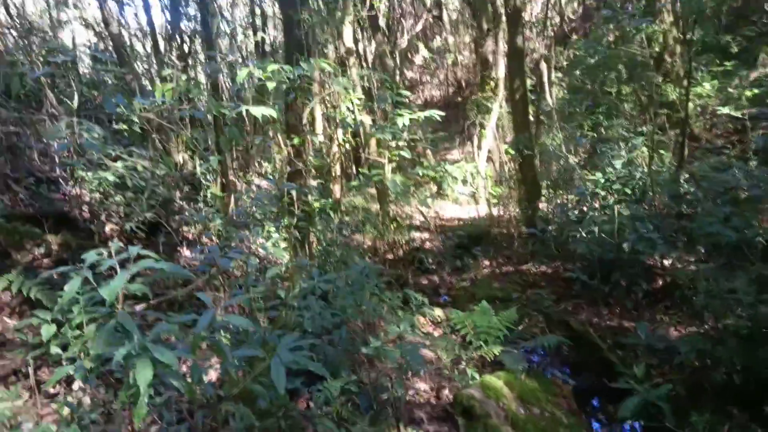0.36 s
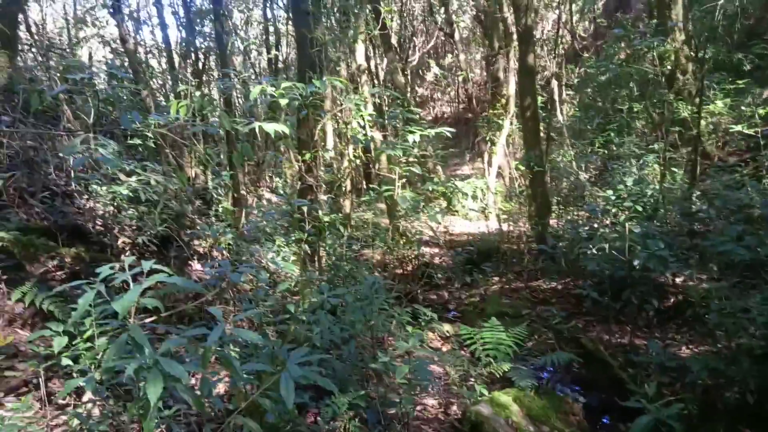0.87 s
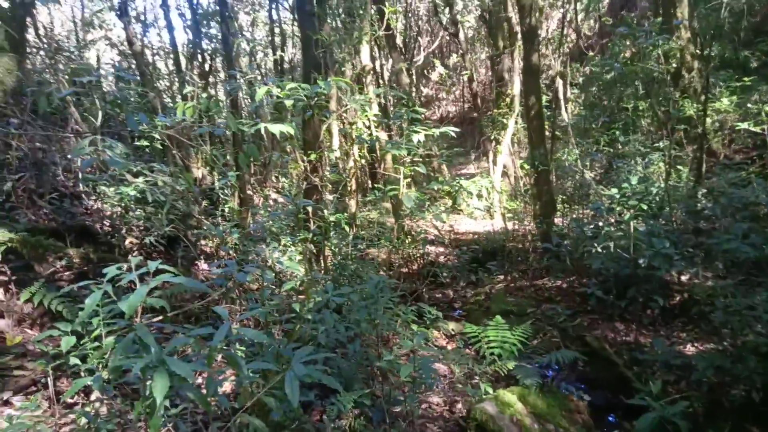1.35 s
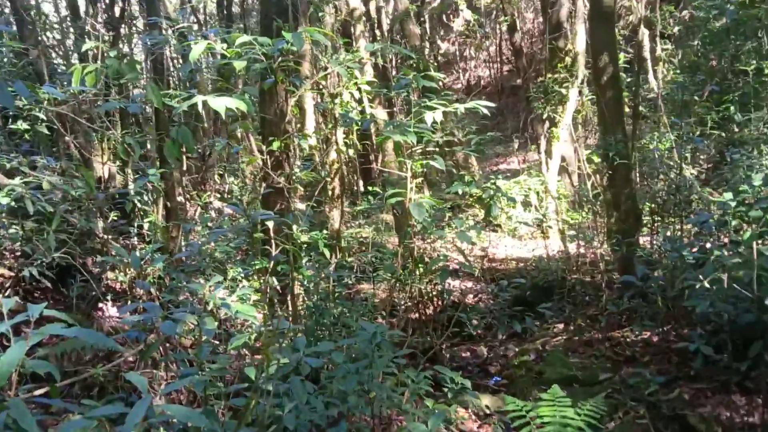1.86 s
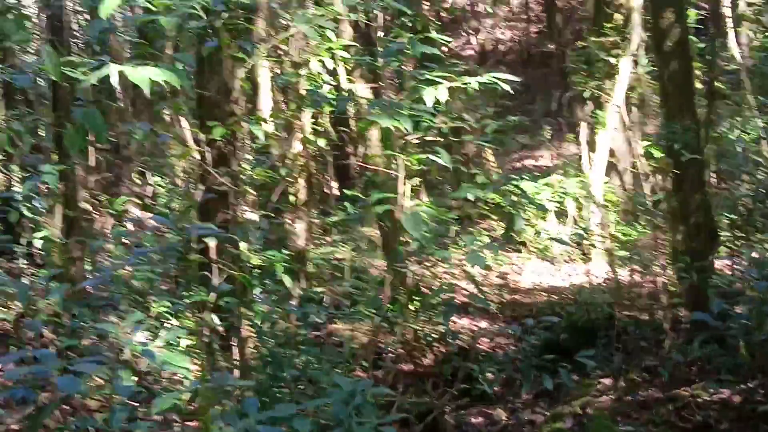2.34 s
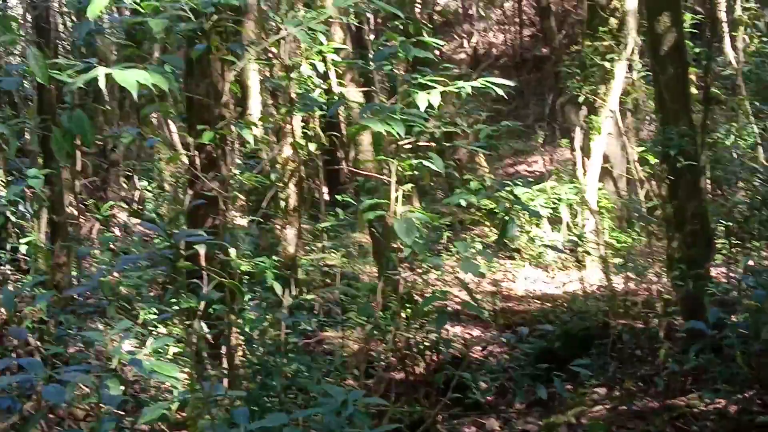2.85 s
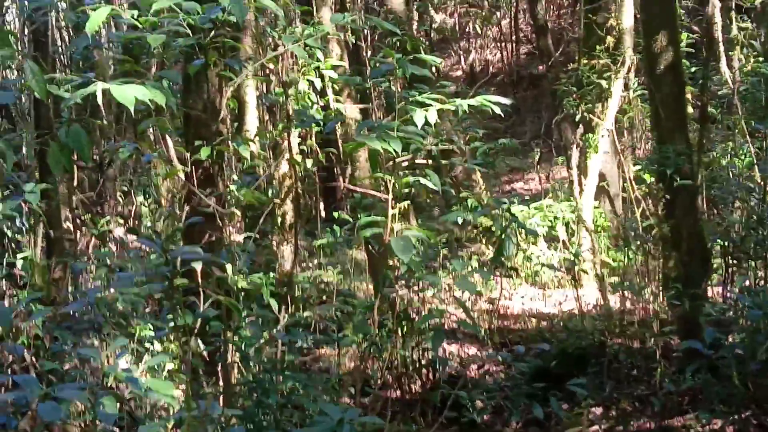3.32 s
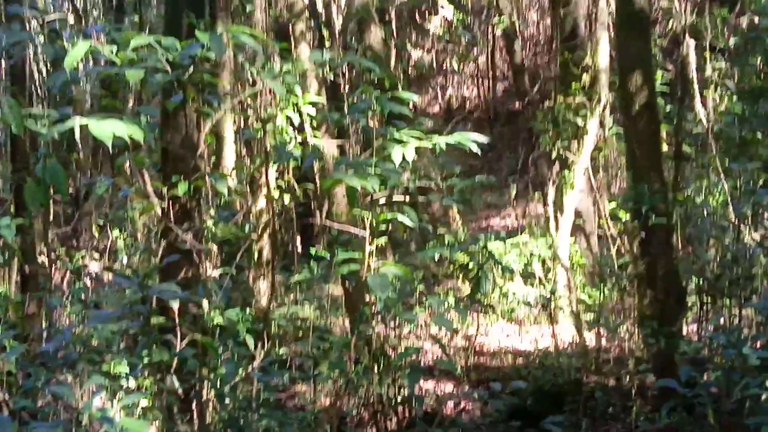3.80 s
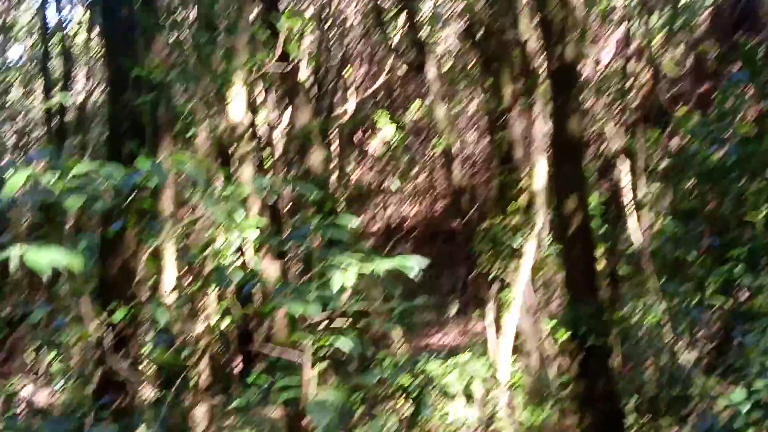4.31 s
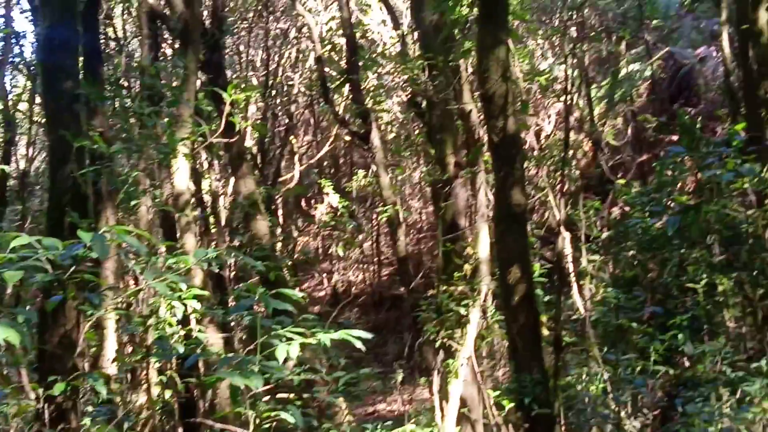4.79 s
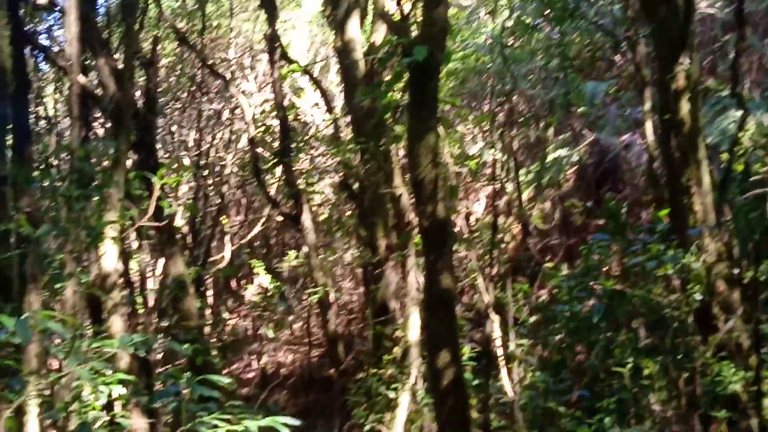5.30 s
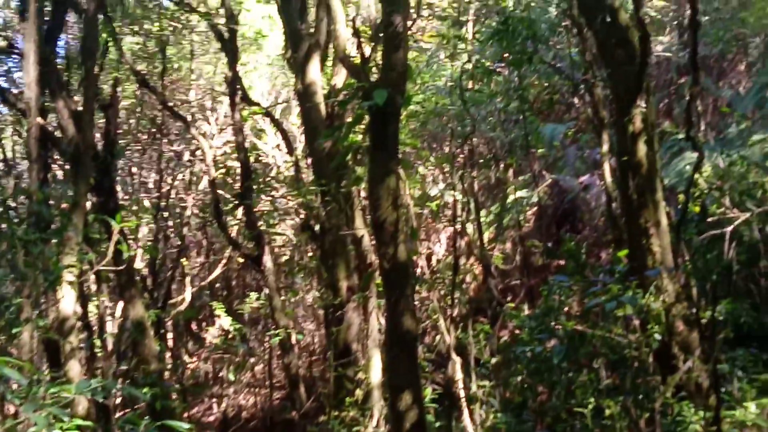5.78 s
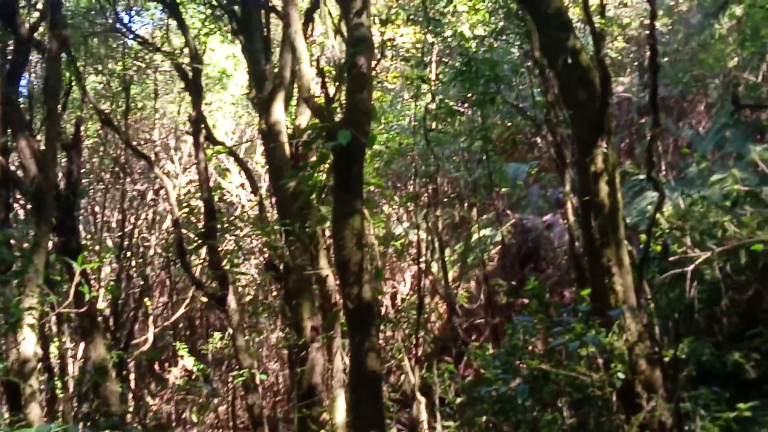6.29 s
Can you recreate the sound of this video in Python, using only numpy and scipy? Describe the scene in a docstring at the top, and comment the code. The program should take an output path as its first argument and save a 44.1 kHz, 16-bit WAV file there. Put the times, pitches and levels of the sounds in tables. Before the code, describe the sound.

In a forest, one cicada shrills continuously, metallic and sizzling, broken into quick throbs. A second, louder and hissier, buzzes in six swells of about 0.8 seconds, each sliding quickly up in pitch and stopping abruptly. Soft dull knocks on the handheld microphone gather in the first three seconds, with a bright snap at one second. A far insect chorus and quiet hush lie behind.

```python
"""A cicada shrills without rest in throbbing phrases: one click train rings four groups of resonances.
A second cicada buzzes in long swells whose pitch slides up: fast rough clicks ring ribs under a moving band.
Fingers knock softly on the microphone housing and something snaps twice: short sums of decaying modes.
Behind lie a far chorus and the hush of the wood, both filtered noise. One handheld microphone hears it all."""
import sys
import numpy as np
from scipy import signal
from scipy.fft import rfft, irfft, next_fast_len
from scipy.io import wavfile
from scipy.ndimage import uniform_filter1d, map_coordinates

SR = 44100
rng = np.random.default_rng(int(sys.argv[2]) if len(sys.argv) > 2 else 0)


def decibels_to_gain(level_db):
    """Convert a level in decibels to a linear amplitude gain (20 dB per decade)."""
    exponent = np.asarray(level_db, float) / 20
    return 10 ** exponent


def wav_record(signal):
    """Record a signal, one row per channel, as 16-bit PCM in the file named by sys.argv[1]."""
    frames = np.transpose(np.atleast_2d(signal))
    bounded = np.clip(frames, -1, 1)
    # unit amplitude maps onto the largest positive 16-bit level
    quanta = np.round(bounded * 32767).astype(np.int16)
    wavfile.write(sys.argv[1], SR, quanta)


N = 293265
TIME = np.arange(N) / SR


def unit(x):
    """Scales to rms 1."""
    return x / np.sqrt(np.mean(x ** 2) + 1e-20)


def along(points, hz):
    """Interpolates (hz, value) points on a log frequency axis."""
    point_hz, value = np.transpose(points)
    return np.interp(np.log(hz + 1), np.log(point_hz + 1), value)


def curves(rows):
    """One value per sample for each column after the time."""
    time_s, *columns = np.transpose(rows)
    return [np.interp(TIME, time_s, column) for column in columns]


def wobble(knots_per_s):
    """A smooth random curve through normally distributed knots."""
    knots = rng.standard_normal(int(N * knots_per_s / SR) + 4)
    return map_coordinates(knots, [TIME * knots_per_s])


def filtered(x, response):
    """Multiplies the spectrum by a response of frequency; the result has rms 1."""
    size = next_fast_len(N + 8192)
    spectrum = rfft(x, size) * response(np.fft.rfftfreq(size, 1 / SR))
    return unit(irfft(spectrum, size)[:N])


def resonant(modes):
    """Steep resonances, each acting twice (width is 6 dB down), added by power."""
    def response(f):
        power = 0
        for centre_hz, width_hz, db in modes:
            detune = (centre_hz ** 2 - f * f) / (f * width_hz + 1)
            power = power + decibels_to_gain(2 * db) / (1 + detune ** 2) ** 2
        return np.sqrt(power)
    return response


def clicks(rate_hz, jitter, rough, sharp):
    """Tymbal clicks of uneven strength, mixed with noise let through once a click; rough is its power share."""
    turns = np.cumsum(rate_hz * (1 + jitter * wobble(60))) / SR
    at = np.flatnonzero(np.diff(np.floor(turns)))
    train = np.zeros(N)
    train[at] = decibels_to_gain(rng.normal(0, 1.65, len(at)))
    rasp = np.exp(-sharp * (turns % 1)) * rng.standard_normal(N)
    return np.sqrt(1 - rough) * unit(train) + np.sqrt(rough) * unit(rasp)


# decay of the echo among the trunks: centre_hz, t60_s
TREE_DECAY = [(2000, 1), (7000, 0.47), (15000, 0.16)]


def among_trees(x, near_db, wet_db):
    """Direct sound, a quick blur from nearby bark and leaves, and scattered echoes dying by frequency."""
    blur_n = SR // 16
    blur = rng.standard_normal(blur_n) * decibels_to_gain(-60 * TIME[:blur_n] / 0.059)
    hz, t, z = signal.stft(rng.standard_normal(SR // 2), SR, nperseg=256)
    decay = decibels_to_gain(-60 * t / along(TREE_DECAY, hz)[:, None])
    tail = signal.istft(z * decay, SR, nperseg=256)[1]
    echo = decibels_to_gain(wet_db) * tail / np.linalg.norm(tail)
    echo[:blur_n] += decibels_to_gain(near_db) * blur / np.linalg.norm(blur)
    echo[0] += 1
    spectrum = rfft(echo, 2 * len(echo))
    # many paths: fine ripples, no broad colour
    spectrum /= np.sqrt(uniform_filter1d(np.abs(spectrum) ** 2, size=160))
    return signal.fftconvolve(x, irfft(spectrum)[:len(echo)])[:N]


# short breaks that make the throbs: break_s
BREAKS = [0.111, 0.2, 0.287, 0.627, 0.758, 0.896, 1.03, 1.162, 1.297, 1.434, 1.566, 1.692, 1.806, 1.917,
          2.017, 2.109, 2.205, 2.298, 2.391, 2.496, 2.581, 2.67, 2.755, 3.091, 3.224, 3.356, 3.489, 3.625,
          3.763, 3.901, 4.033, 4.162, 4.291, 4.417, 4.536, 4.648, 4.743, 4.845, 4.942, 5.033, 5.131, 5.234,
          5.339, 5.426, 5.858, 5.99, 6.12, 6.24, 6.37, 6.492, 6.608]


def throb(depth_db, lag_s, width_s):
    """A soft-edged bump lag_s after every break, as tall as the depth at that break."""
    t = TIME[::32]
    bumps_db = np.zeros(len(t))
    for break_s in BREAKS:
        height_db = np.interp(break_s, TIME, depth_db)
        bumps_db += height_db * np.exp(-((t - break_s - lag_s) / width_s) ** 4)
    return np.interp(TIME, t, bumps_db)


# song of the shrilling singer, level of its belly tone before throbs, turn to the microphone:
# time_s, clicks_per_s, belly_db, turn_db
SHRILL_SONG = [(0.0, 142, -42.5, -2), (0.16, 133, -40, -2), (0.4, 145, -41.5, -1), (0.55, 184, -39.5, -1.5),
               (0.81, 196, -44.5, -0.5), (1.65, 203, -46, 0.5), (1.87, 154, -45, -0.5),
               (2.68, 123, -45.5, -2), (2.83, 144, -44.5, -4), (2.94, 210, -40.5, 1),
               (3.06, 210, -40, -0.5), (3.2, 216, -42.5, 1), (4.35, 197, -42.5, 3.5), (4.68, 153, -41.5, 4),
               (5.5, 135, -42.5, 2), (5.7, 186, -41, 4), (5.85, 200, -40.5, 4), (6.65, 180, -43.5, 5)]
# belly resonances: centre_hz, width_hz, relative_db
BELLY_MODES = [(1980, 200, -17.5), (2453, 286, -5.5), (2680, 230, 1.5), (2774, 283, 5.5), (3060, 294, -5.5),
               (3130, 90, -11), (2650, 430, -20.5)]
# open belly resonances: centre_hz, width_hz, relative_db
OPEN_BELLY_MODES = [(3938, 144, -5), (4643, 230, 1.5), (4880, 140, -9)]
# tymbal resonances: centre_hz, width_hz, relative_db
TYMBAL_MODES = [(5350, 117, -7), (5110, 240, -5), (5290, 280, -5), (5490, 230, -10), (5648, 480, -1)]
# sizzle ridges, shifting with effort: centre_hz, width_hz, slow_clicks_db, fast_clicks_db
SIZZLE_MODES = [(10100, 260, -0.5, -1), (10550, 460, -0.5, 1), (11180, 500, 1, 0), (11500, 300, -8, -2),
                (12050, 310, -19, -6), (12550, 330, 3, 2.5), (13200, 520, 2, 3.5), (13550, 350, -6, -6),
                (14000, 410, -4, -5), (14500, 370, -9, -4), (15300, 310, -8, -5)]


def shrill():
    """One click train rings four groups of resonances; a squeeze lifts belly and tymbal, chokes the others."""
    rate_hz, belly_db, turn_db = curves(SHRILL_SONG)
    calm_hz, effort_span_hz, usual_db = 144, 39, -43
    effort = np.clip((rate_hz - calm_hz) / effort_span_hz, 0, 1)
    # calm to full effort; squeeze also grows per dB of turning
    break_db = 23 + (9.5 - 23) * effort
    squeeze_db = 0.5 + (12.5 - 0.5) * effort + 0.46 * turn_db * effort

    # upper tones: shares of loudness swing and turning, gain with effort
    swing_db = belly_db - usual_db
    open_db = -56.5 - 0.37 * swing_db + 1.14 * turn_db + 0.5 * effort
    tymbal_db = -48 - 0.34 * swing_db + 0.81 * turn_db
    sizzle_db = -56 - 0.3 * turn_db + 3 * effort

    # each group follows the squeeze by its own share and lag
    belly_db = belly_db + 0.26 * throb(squeeze_db, lag_s=0.025, width_s=0.012)
    open_db = open_db - 0.98 * throb(squeeze_db, lag_s=0.019, width_s=0.031)
    tymbal_db = tymbal_db + 0.15 * throb(squeeze_db, lag_s=0.037, width_s=0.015)
    sizzle_db = sizzle_db - 0.65 * throb(squeeze_db, lag_s=0.032, width_s=0.032)

    drive = clicks(rate_hz, jitter=0.012, rough=0.3, sharp=2.5)
    drive = drive * decibels_to_gain(-throb(break_db, lag_s=0.00069, width_s=0.0071))
    belly = decibels_to_gain(belly_db) * filtered(drive, resonant(BELLY_MODES))
    opened = decibels_to_gain(open_db) * filtered(drive, resonant(OPEN_BELLY_MODES))
    tymbal = decibels_to_gain(tymbal_db) * filtered(drive, resonant(TYMBAL_MODES))

    hissing = drive + 1.3 * rng.standard_normal(N)
    slow = filtered(hissing, resonant(np.delete(SIZZLE_MODES, 3, axis=1)))
    fast = filtered(hissing, resonant(np.delete(SIZZLE_MODES, 2, axis=1)))
    sizzle = decibels_to_gain(sizzle_db) * ((1 - effort) * slow + effort * fast)
    return among_trees(belly + opened + tymbal + sizzle, near_db=1.5, wet_db=-4.5)


# swells of the buzzing singer, release time and depth of the opening pitch scoop:
# start_s, release_s, full_db, scoop_hz
SWELL_SONG = [(-.08, 0.738, -31, 1300), (1.169, 1.978, -30, 1300), (2.472, 3.283, -30.5, 1280),
              (3.749, 4.56, -34, 700), (4.959, 5.875, -33.5, 700), (6.29, 7.1, -33.5, 900)]
# ribbed resonances: centre_hz, width_hz, relative_db
RIB_MODES = [(6000, 220, 3), (6320, 270, 5.5), (6785, 340, -0.5), (7070, 150, -7), (7660, 200, -4),
             (7800, 290, -8), (8570, 530, 0), (7900, 10000, 2)]


def swell():
    """Fast clicks ring the ribs; the loudest region scoops up at each start, low ribs fall silent first."""
    current = np.searchsorted(np.transpose(SWELL_SONG)[0], TIME) - 1
    start_s, release_s, full_db, scoop_hz = np.transpose(SWELL_SONG)[:, current]
    attack_s, settle_s, settle_db, sag_db_per_s = 0.067, 0.1, 5, 2
    release_db_per_s, murmur_db, thin_s = 150, -51.5, 0.23
    since_s = TIME - start_s
    released_s = np.clip(TIME - release_s, 0, None)
    thinning_s = TIME - release_s + thin_s  # begins before release

    level_db = full_db - settle_db * np.exp(-since_s / settle_s)
    level_db = level_db - sag_db_per_s * since_s - release_db_per_s * released_s
    level = np.clip(since_s / attack_s, 0, 1) * decibels_to_gain(level_db) + decibels_to_gain(murmur_db)
    centre_hz = 7080 - scoop_hz * np.exp(-since_s / 0.047) + 120 * since_s
    centre_hz = centre_hz + 280 * np.clip(thinning_s / 0.39, 0, 1)

    drive = clicks(465 + 70 * np.exp(-since_s / 0.55), jitter=0.015, rough=0.93, sharp=1.2)
    ribs = filtered(drive, resonant(RIB_MODES))
    hz, t, z = signal.stft(ribs, SR, nperseg=256, noverlap=192)
    off_hz = hz[:, None] - np.interp(t, TIME, centre_hz)
    # sharp lower edge; gentler upper edge opens during the scoop
    upper_hz = np.interp(t, TIME, 750 - 0.19 * scoop_hz * np.exp(-since_s / 0.086))
    off = off_hz / np.where(off_hz < 0, 480, upper_hz)
    band = 1 / (1 + off ** 2 / 2) ** 2
    z = z * band / np.linalg.norm(band, axis=0)
    buzz = unit(signal.istft(z, SR, nperseg=256, noverlap=192)[1][:N])
    return among_trees(level * decibels_to_gain(0.16 * wobble(12)) * buzz, near_db=-9, wet_db=-4.5)


def ringing(modes, t):
    """Sum of decaying sines from (hz, db, t60_s) modes."""
    return sum(decibels_to_gain(db - 60 * t / t60_s) * np.sin(2 * np.pi * hz * t) for hz, db, t60_s in modes)


# knocks on the housing, modes woken and noisy edge: start_s, level_db, centre_hz, spread_octaves, edge_db
KNOCK_EVENTS = [(0.432, -44, 117, 0.92, -18), (0.556, -39, 110, 1.7, -8), (1.04, -40, 350, 0.72, -8),
                (1.077, -39, 750, .9, -0.5), (1.127, -31, 260, 1.7, -4.5), (1.214, -42, 500, 0.93, 2),
                (1.234, -47, 200, 1.1, -1), (1.585, -44.5, 602, 1.9, 1), (1.932, -39, 285.3, 0.88, -9),
                (1.951, -26.5, 880, 0.45, -12.5), (1.961, -36, 110, 0.91, -19), (2.172, -35, 400, 1.03, -7),
                (2.723, -32, 350, 1.2, -13), (2.745, -38, 70, 0.77, -25), (2.947, -38, 1298, 0.87, -11),
                (3.559, -44, 80, .8, -25), (4.459, -44, 69.9, 0.67, -25), (5.371, -41.5, 280, 1.2, -20)]
# microphone housing modes: mode_hz, relative_db, t60_s
HOUSING_MODES = [(65.5, -11, 0.09), (115, 2, 0.038), (258, 0.5, 0.03), (400, 0.5, 0.024),
                 (538, -1.5, 0.033), (880, 1, 0.01), (1620, 1.5, 0.019)]
# sharp snaps: start_s, level_db
SNAP_EVENTS = [(1.0067, -15), (2.173, -30)]
# modes of a snap: mode_hz, relative_db, t60_s
SNAP_RING = [(2340, -3, 0.0044), (3240, 0, 0.0077), (4000, 7.5, 0.005), (8660, 6, 0.0043), (9400, 0, .004),
             (11800, -4, 0.0047), (13200, -8, .003), (14800, -6, .003)]


def handling():
    """Dull knocks wake part of the housing's modes and a noisy edge; a sharp snap rings a few high modes."""
    out = np.zeros(N + SR)
    t = np.arange(SR // 8) / SR
    for start_s, level_db, centre_hz, spread_octaves, edge_db in KNOCK_EVENTS:
        woken = []
        for hz, db, t60_s in HOUSING_MODES:
            distance = np.log2(hz / centre_hz) / spread_octaves
            woken.append((hz, db - 7.8 * distance ** 2, t60_s))
        noise = 4 * uniform_filter1d(rng.standard_normal(len(t)), size=16)
        edge = decibels_to_gain(edge_db - 60 * t / 0.032) * noise
        onset = (1 - np.exp(-t / 0.0017)) ** 2
        out[round(start_s * SR):][:len(t)] += decibels_to_gain(level_db) * onset * (ringing(woken, t) + edge)
    for start_s, level_db in SNAP_EVENTS:
        onset = 1 - np.exp(-t / 0.0018)
        out[round(start_s * SR):][:len(t)] += decibels_to_gain(level_db) * onset * ringing(SNAP_RING, t)
    out = out[:N]
    # the microphone drops the deepest thump; overall level is restored
    return filtered(out, lambda hz: hz ** 2 / (hz ** 2 + 55 ** 2)) * np.std(out)


# far chorus resonances: centre_hz, width_hz, relative_db
FAR_MODES = [(6730, 510, -9.5), (7310, 420, -4.5), (7800, 770, -9)]


def far_chorus():
    """So many far singers that their clicks melt into resonant noise."""
    noise = filtered(rng.standard_normal(N), resonant(FAR_MODES))
    return decibels_to_gain(-42 + 1.06 * wobble(3.28)) * noise


# spectrum of the hush: point_hz, relative_density_db
HUSH_SPECTRUM = [(25, -30), (40, -15), (60, -6.5), (100, -3.5), (250, -1.5), (600, -7), (1400, -10.5),
                 (3700, -8), (9000, -9), (16000, -15)]


def hush():
    """Distant leaves and the microphone's own hiss: shaped noise, slowly restless."""
    air = filtered(rng.standard_normal(N), lambda hz: decibels_to_gain(along(HUSH_SPECTRUM, hz)))
    return decibels_to_gain(-53.5 + 0.5 * wobble(3) + 0.8 * wobble(15)) * air


def scene():
    """One microphone feeds both channels."""
    mono = shrill() + swell() + handling() + far_chorus() + hush()
    return np.tile(mono, (2, 1))


def band_limit(x):
    """A steep low-pass at the top of the band."""
    return signal.sosfilt(signal.butter(12, 15720, fs=SR, output="sos"), x)


def record(dry):
    """Stores the finished mix."""
    return band_limit(dry)


dry = scene()
out = record(dry)
wav_record(out)
```